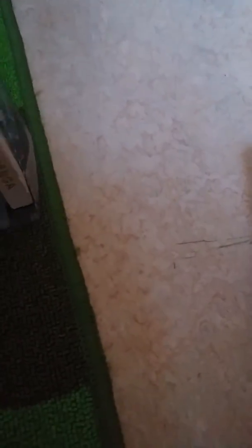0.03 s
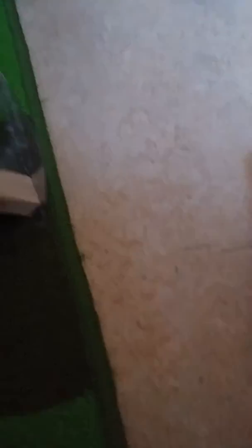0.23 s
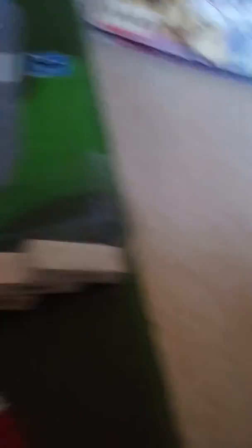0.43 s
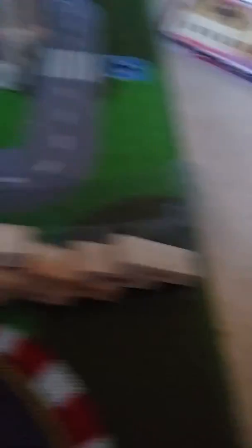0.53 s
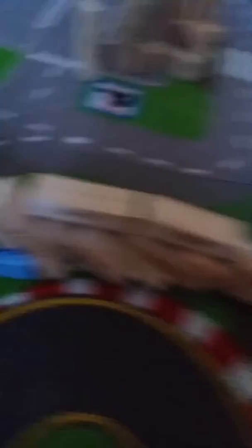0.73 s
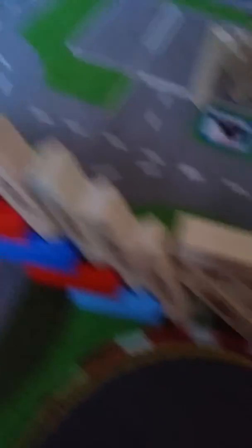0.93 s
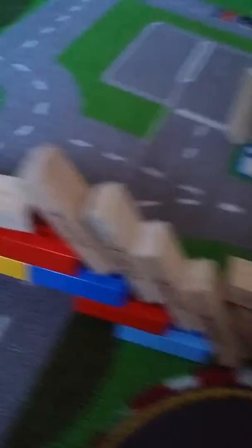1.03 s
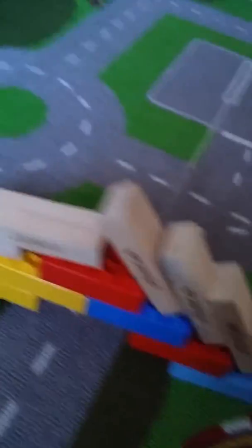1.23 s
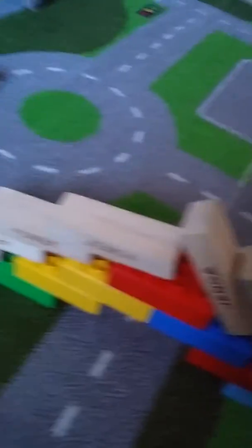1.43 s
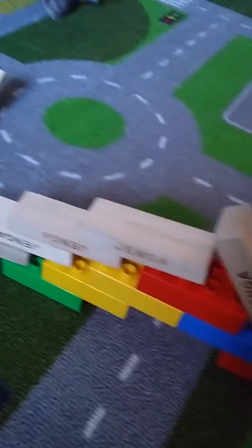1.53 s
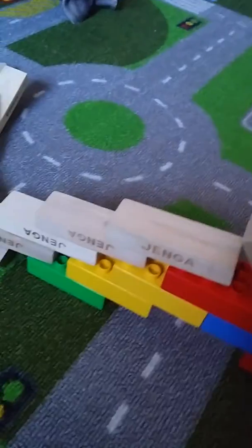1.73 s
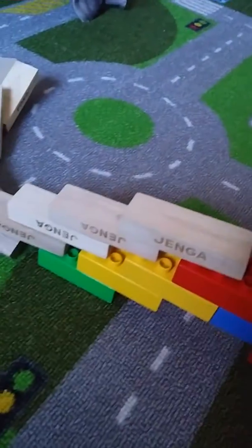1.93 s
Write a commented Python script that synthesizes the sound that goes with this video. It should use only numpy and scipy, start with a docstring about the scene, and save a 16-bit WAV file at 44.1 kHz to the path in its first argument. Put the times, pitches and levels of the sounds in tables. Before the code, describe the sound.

A quick run of sharp wooden clacks as a line of blocks falls over.

```python
"""A row of small wooden blocks topples on a play mat, close to a stereo microphone in a small room.
Each block cracks against the next, rings briefly and rebounds, setting the leaning stack clacking.
Flat faces slap together; the fallen blocks clatter and scrape as they settle, roll and thud on the mat.
Behind them lie a low rumble, room noise, a thin whine and a faint ringing hiss that rises at the end.
The right microphone port sounds duller than the left."""
import sys
import numpy as np
from scipy import signal
from scipy.fft import rfft, irfft, next_fast_len
from scipy.io import wavfile
from scipy.ndimage import uniform_filter1d, minimum_filter1d

SR = 44100
rng = np.random.default_rng(int(sys.argv[2]) if len(sys.argv) > 2 else 0)


def output_pcm(signal):
    """Save a mono or channel-first signal as 16-bit PCM at the path in sys.argv[1].

    Samples are clipped to [-1, 1] before scaling.
    """
    pcm = np.clip(np.atleast_2d(signal).T, -1, 1) * 32767
    wavfile.write(sys.argv[1], SR, np.round(pcm).astype(np.int16))


N = 88200

# block striking block, close up; each level is relative within its column
# (time [s], crack [dB], clack [dB], low mode [dB], high mode [dB], low mode [Hz], high mode [Hz])
CONTACTS = [(0.1278, -38, -53.5, -44.5, -42, 5860, 7240), (0.2083, -27, -37, -20, -21, 5850, 7710),
            (0.2534, -31.5, -45, -24.5, -55, 5850, 8100), (0.2686, -27, -46, -13, -24.5, 5920, 8030),
            (0.2894, -34, -40.5, -13, -30.5, 5870, 6670), (0.3276, -22.5, -36, -15.5, -20, 5870, 7490),
            (0.381, -15, -43.5, -11.5, -7.5, 5580, 7680), (0.4424, -17.5, -36.5, -16.5, -18, 5290, 8220),
            (0.4677, -11, -41.5, -26.5, -22.5, 5490, 7260), (0.502, -12.5, -32, -10.5, -10, 5720, 7680),
            (0.5409, -6.5, -22, -20.5, -19.5, 5500, 7680), (0.5595, -17, -15, -17, -27.5, 5190, 7860),
            (0.5732, -22.5, -18.5, -18.5, -12, 5940, 7820), (0.6084, -9, -23.5, -32.5, -18, 5910, 7780),
            (0.6275, -20, -20.5, -28.5, -27, 5600, 7545), (0.6796, -16, -33.5, -35.5, -28, 5740, 8360),
            (0.6832, -32.5, -23.5, -36, -32.5, 5740, 7530), (0.7403, -36.5, -29.5, -35, -39.5, 6000, 8000),
            (0.768, -27, -25.5, -26.5, -21.5, 5710, 6870), (0.7782, -17.5, -16.5, -26, -26, 5240, 7500),
            (0.8355, -15.5, -27, -19.5, -28.5, 5550, 7300), (0.841, -17.5, -22, -25, -29.5, 5840, 6700),
            (0.8962, -17.5, -35, -18.5, -24.5, 6130, 7660), (0.899, -22.5, -22.5, -45.5, -34, 5490, 8300),
            (0.961, -15.5, -34.5, -13.5, -10.5, 5590, 7580), (0.9906, -8.5, -21, -10, -10.5, 5780, 7270),
            (1.0178, -11, -21.5, -33, -18.5, 5530, 8000), (1.063, -13, -43, -17, -32, 5220, 7300),
            (1.089, -18, -37, -20, -19.5, 5180, 7560), (1.0975, -21, -24.5, -37, -29.5, 5180, 7530),
            (1.1368, -15.5, -69, -21, -15, 5040, 6780), (1.2305, -16, -36.5, -28, -18.5, 5540, 6810),
            (1.311, -17.5, -43.5, -43.5, -14.5, 5800, 6770), (1.3147, -9.5, -31.5, -23, -14, 4980, 6900)]
# crack of a contact (frequency [Hz], gain [dB])
CRACK_SPECTRUM = [(300, -29.5), (2000, -14), (3700, 3.5), (8300, 6.5), (11500, -19), (14500, -37.5),
                  (16500, -60.5)]
# body of the leaning stack (frequency [Hz], gain [dB])
STACK_SPECTRUM = [(280, -28.5), (1000, -1), (1750, 0.5), (2400, 1.5), (3400, -3.5), (12000, -46)]
# modes of the leaning stack (frequency [Hz], relative level [dB])
STACK_MODES = [(1230, -9), (2150, -4.5), (2360, -1), (2720, 0.5)]
# flat faces slapping together (time [s], level [dB], pitch [Hz])
FACE_SLAPS = [(0.467, -23, 2794), (1.2761, -34.5, 4820)]
# fallen blocks settling (time [s], clatter level [dB], scrape level [dB])
SETTLING_LEVELS = [(.11, -84, -71), (.135, -65.5, -47.5), (.28, -43.5, -70), (.4, -45, -28.5),
                   (.49, -40.5, -39), (.575, -24.5, -23.5), (.66, -35, -37.5), (.725, -64, -50),
                   (.8, -41, -40.5), (.94, -39.5, -38), (1.03, -30, -34), (1.16, -45, -31),
                   (1.22, -49, -43), (1.345, -48.5, -40.5), (1.6, -83.5, -75)]
# wood sliding on wood (frequency [Hz], gain [dB])
SCRAPE_SPECTRUM = [(300, -17), (2800, -10), (5500, -2), (7700, 1.5), (11500, -30.5), (16000, -58.5)]
# blocks landing on the mat (time [s], level [dB])
LANDINGS = [(0.329, -39.5), (0.441, -38), (0.505, -33.5), (1.254, -36.5), (1.376, -45.5)]
# body of the mat and the floor under it (frequency [Hz], gain [dB])
MAT_SPECTRUM = [(50, -34), (160, -13), (240, -1.5), (380, -9.5), (800, -15), (3000, -55.5)]
# blocks rolling over their edges (time [s], level [dB])
ROLL_LEVELS = [(.1, -81.5), (.21, -53.5), (.58, -36), (.8, -85)]
# course of the low rumble (time [s], level [dB])
RUMBLE_LEVELS = [(0, -71.5), (.85, -56.5), (1.0, -62), (1.39, -52.5), (1.52, -73)]
# colour of the rumble (frequency [Hz], gain [dB])
RUMBLE_SPECTRUM = [(25, -28.5), (62, -2.5), (135, 7.5), (400, -33)]
# reverberation of the small room (frequency [Hz], T60 [s])
ROOM_DECAY = [(150, 0.82), (1500, 0.19), (12000, 0.16)]
# steady room noise (frequency [Hz], gain [dB])
ROOM_TONE_SPECTRUM = [(25, 1), (600, -8.5), (4000, -29.5), (7000, 5), (13000, -33.5)]
# faint hiss (frequency [Hz], gain [dB])
HISS_SPECTRUM = [(1500, 3.5), (7000, -3), (16000, -24.5)]
# fuzzy tones that rise with the hiss (frequency [Hz], relative level [dB])
HISS_TONES = [(2164, -76), (2681, -75), (4570, -74), (5346, -72.5)]
# steady tones of the whine (frequency [Hz], level [dB])
WHINE_TONES = [(657, -84), (1179, -80), (1314, -79.5)]
# colour of the right microphone port (frequency [Hz], gain [dB])
RIGHT_PORT_RESPONSE = [(200, -1), (2400, -4), (5000, -1.5), (7000, -12), (8500, -18.5), (14000, -13)]

LOW_T60, HIGH_T60, CRACK_T60, CLACK_T60, STACK_T60 = 0.0074, 0.012, 0.0071, 0.02, 0.028  # s
LOW_DB, HIGH_DB, TOP_DB, CRACK_DB, CLACK_DB, STACK_DB = -5.5, -4, -23, -8.5, -6.5, -9  # added to CONTACTS
TOP_RATIO, STACK_SCATTER = 1.76, .018  # top mode over low mode; pitch spread as a share of the pitch
KNOCK_PAN_DB, CLATTER_PAN_DB, SCRAPE_PAN_DB, NOISE_PAN_DB = 1, -1.5, 0.5, 0.5  # left over right
NARROW, WIDE = .35, 0.93  # side over mid


def knocks():
    """Each contact cracks, rings three modes of the block and sets the leaning stack clacking."""
    out, t = np.zeros((2, N)), np.arange(SR // 10) / SR
    for start, crack_db, clack_db, low_db, high_db, low_hz, high_hz in CONTACTS:
        ring = amp(low_db + LOW_DB) * wood_mode(t, low_hz, LOW_T60)
        ring += amp(high_db + HIGH_DB) * wood_mode(t, high_hz, HIGH_T60)
        ring += amp(high_db + TOP_DB) * wood_mode(t, low_hz * TOP_RATIO, HIGH_T60)
        stack = struck_stack(t)
        hit = pan(KNOCK_PAN_DB) * rebounds(ring)
        crack = amp(crack_db + CRACK_DB) * impact(t, CRACK_T60, CRACK_SPECTRUM, WIDE)
        clack = amp(clack_db) * (stack + amp(CLACK_DB) * impact(t, CLACK_T60, STACK_SPECTRUM, WIDE))
        add(hit, 0, pan(KNOCK_PAN_DB) * crack + pan(CLATTER_PAN_DB) * clack)
        add(out, start, room(hit))
    return out


def wood_mode(t, hz, t60, attack_s=0.00033, right_delay_s=0.0001):
    """One damped vibration of the wood, reaching the left side of the microphone first."""
    age = np.maximum(t - np.array([[0], [right_delay_s]]), 0)
    attack = 1 - np.exp(-age / attack_s)
    return unit_blow(np.sin(2 * np.pi * hz * age) * fade(age, t60) * attack)


def impact(t, t60, spectrum, width):
    """A dying burst of noise, coloured by the body that is struck."""
    return unit_blow(colour(stereo_noise(len(t), width) * fade(t, t60), spectrum))


def struck_stack(t):
    """The leaning stack rings in modes of alternating sign, tuned a little differently at each blow."""
    ring = np.zeros((2, len(t)))
    for k, (hz, db) in enumerate(STACK_MODES):
        pitch = hz * (1 + STACK_SCATTER * rng.standard_normal())
        ring += (-1) ** k * amp(db + STACK_DB) * wood_mode(t, pitch, STACK_T60)
    return ring


def rebounds(ring, count=5, mean_flight_s=0.0098, first_db=-13.5, loss_db=5):
    """The block strikes, then chatters against its neighbour ever more softly."""
    out = np.pad(ring, ((0, 0), (0, SR // 10)))
    flights = mean_flight_s * (.5 + rng.random(count))
    for k, start in enumerate(np.cumsum(flights)):
        add(out, start, amp(first_db - k * loss_db) * ring)
    return out


def slaps(half_length_cycles=0.6):
    """Two faces meet flat: a crack about one cycle long, with no ring in the wood."""
    out, t = np.zeros((2, N)), np.arange(SR // 10) / SR
    for start, db, hz in FACE_SLAPS:
        cycles = hz * t - 2
        crack = np.sin(2 * np.pi * cycles) * np.exp(-(cycles / half_length_cycles) ** 2)
        add(out, start, room(pan(KNOCK_PAN_DB) * amp(db) * unit_blow(crack)))
    return out


def settling(ring_db=-7.5):
    """Fallen blocks clatter, ringing the hollow stack, and slide on each other."""
    t = np.arange(SR // 10) / SR
    clatter_gain, scrape_gain = envelopes(SETTLING_LEVELS)
    clatter = clatter_gain * pan(CLATTER_PAN_DB) * rattle(STACK_SPECTRUM)
    stack = sum(amp(db) * np.sin(2 * np.pi * hz * t) for hz, db in STACK_MODES) * fade(t, STACK_T60)
    ring = signal.fftconvolve(clatter, stack[None], axes=1)[:, :N]
    clatter += amp(ring_db) * clatter.std() * unit(ring)
    scrape = scrape_gain * pan(SCRAPE_PAN_DB) * rattle(SCRAPE_SPECTRUM)
    return room(clatter + scrape)[:, :N]


def rattle(spectrum, grains_per_s=660, spread_db=13, grain_t60=0.0033):
    """A stream of tiny random contacts through a resonant body, at rms 1."""
    out, t = np.zeros((2, N)), np.arange(SR // 50) / SR
    for position, size in rng.random((int(grains_per_s * N / SR), 2)):
        grain = amp(spread_db * size) * stereo_noise(len(t), WIDE) * fade(t, grain_t60)
        add(out, position * N / SR, grain)
    return unit(colour(out, spectrum))


def mat_thuds(t60=.035, room_send_db=-13.5):
    """Blocks land on the mat with dull knocks, dead centre and with little of the room."""
    out, t = np.zeros((2, N)), np.arange(SR // 6) / SR
    for start, db in LANDINGS:
        thud = amp(db) * impact(t, t60, MAT_SPECTRUM, width=0)
        add(out, start, thud)
        add(out, start, amp(room_send_db) * room(thud))
    return out


def rolling():
    """Blocks roll softly over their edges, sounding the mat and the floor."""
    return envelopes(ROLL_LEVELS)[0] * steady_noise(MAT_SPECTRUM, NARROW)


def rumble():
    """A low rumble swells twice under the falling row."""
    return envelopes(RUMBLE_LEVELS)[0] * steady_noise(RUMBLE_SPECTRUM, NARROW)


def room(x, early_db=-4.5, early_t60=0.024, tail_db=-7):
    """The microphone hears direct sound, scatter off nearby blocks and floor, then the room's tail."""
    hz, frame_s, bands = signal.stft(rng.standard_normal((2, SR // 2)), SR, nperseg=256)
    band_t60 = log_interp(ROOM_DECAY, hz)[:, None]
    tail = signal.istft(bands * fade(frame_s, band_t60), SR, nperseg=256)[1]
    t = np.arange(tail.shape[1]) / SR
    early = rng.standard_normal(tail.shape) * fade(t, early_t60) * (t > .001)
    tail *= t > .005
    response = amp(tail_db) * tail / np.linalg.norm(tail[0])
    response += amp(early_db) * early / np.linalg.norm(early[0])
    response[:, 0] += 1  # direct path
    return signal.fftconvolve(x, response, axes=1)


def room_tone(level_db=-68.5):
    """The steady, quiet noise of the room."""
    return pan(NOISE_PAN_DB) * amp(level_db) * steady_noise(ROOM_TONE_SPECTRUM, WIDE)


def ringing_hiss(level_db=-65, start_s=1.84, rise_s=.035, tone_width_hz=50, tones_before_db=-14):
    """A faint hiss comes in near the end, and fuzzy tones rise with it."""
    t, freqs = np.arange(N) / SR, np.fft.rfftfreq(N, 1 / SR)
    rise = np.clip((t - start_s) / rise_s, 0, 1)
    hiss = amp(level_db) * rise * steady_noise(HISS_SPECTRUM, WIDE)
    for hz, db in HISS_TONES:
        peak = 1 / (1 + (2 * (freqs - hz) / tone_width_hz) ** 2)
        tone = unit(irfft(rfft(stereo_noise(N, WIDE)) * peak, N))
        hiss += (amp(tones_before_db) + rise) * amp(db) * tone
    return pan(NOISE_PAN_DB) * hiss


def whine(swell_s=1.44, swell_width_s=0.013, swell_hz=1185, swell_db=-43):
    """A thin steady whine, with one tone that swells briefly out of it."""
    t = np.arange(N) / SR
    steady = sum(amp(db) * unit(np.sin(2 * np.pi * hz * t)) for hz, db in WHINE_TONES)
    swell = amp(swell_db) * np.exp(-((t - swell_s) / swell_width_s) ** 2 / 2)
    return steady + swell * np.sin(2 * np.pi * swell_hz * t)


def amp(db):
    return 10 ** (np.asarray(db) / 20)


def pan(db):
    return amp([[db / 2], [-db / 2]])


def fade(t, t60):
    return np.exp(-np.log(1000) * t / t60)


def unit(x):
    """Scale to rms 1."""
    return x / np.sqrt(np.mean(x ** 2) + 1e-20)


def unit_blow(x, blow_s=.01):
    """Give a short sound the energy of rms 1 held for blow_s."""
    return x * np.sqrt(blow_s * SR / np.mean(np.sum(x ** 2, axis=-1)))


def log_interp(points, hz):
    """Interpolate (frequency [Hz], value) points on a log axis."""
    freqs, values = np.transpose(points)
    return np.interp(np.log(hz + 1), np.log(freqs + 1), values)


def envelopes(rows):
    """One gain per sample for each level column of (time [s], level [dB], ...)."""
    times, *columns = np.transpose(rows)
    return [amp(np.interp(np.arange(N) / SR, times, db)) for db in columns]


def colour(x, spectrum):
    """Minimum-phase filter through (frequency [Hz], gain [dB]) points."""
    n = x.shape[-1]
    size = 2 * next_fast_len(n)
    gain = amp(log_interp(spectrum, np.fft.rfftfreq(size, 1 / SR)))
    cepstrum = irfft(np.log(gain), size)
    cepstrum[1:size // 2] *= 2  # folding onto positive time makes the filter causal
    cepstrum[size // 2 + 1:] = 0
    return irfft(rfft(x, size) * np.exp(rfft(cepstrum)), size)[..., :n]


def stereo_noise(n, width):
    """White noise; width is side over mid."""
    mid, side = rng.standard_normal((2, n))
    return np.array([mid + width * side, mid - width * side])


def steady_noise(spectrum, width):
    """Coloured stereo noise for the whole scene, at rms 1."""
    return unit(colour(stereo_noise(N, width), spectrum))


def add(out, start_s, x):
    """Mix x into out at start_s."""
    i = int(np.clip(round(start_s * SR), 0, out.shape[1]))
    out[:, i:i + x.shape[-1]] += x[:, :out.shape[1] - i]


def scene():
    """The blocks close to the microphone, with the quiet room behind them."""
    toppling = knocks() + slaps() + mat_thuds() + rolling()
    background = rumble() + room_tone() + ringing_hiss() + whine()
    return toppling + settling() + background


def record(dry):
    """The right microphone port is duller; a fast limiter holds the peaks; the top treble is cut."""
    ceiling, limiter_s, cutoff_hz = .85, .002, 16400
    mic = np.array([dry[0], colour(dry[1], RIGHT_PORT_RESPONSE)])
    needed_gain = ceiling / np.maximum(np.abs(mic).max(axis=0), ceiling)
    span = round(limiter_s * SR)
    limited = mic * uniform_filter1d(minimum_filter1d(needed_gain, 2 * span), span)
    passband = np.fft.rfftfreq(2 * N, 1 / SR) < cutoff_hz
    return irfft(rfft(limited, 2 * N) * passband)[:, :N]


dry = scene()
out = record(dry)
output_pcm(out)
```